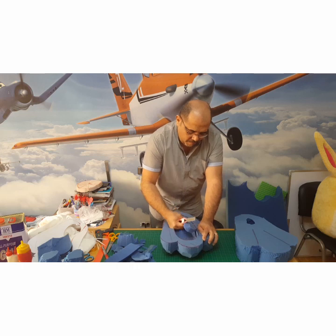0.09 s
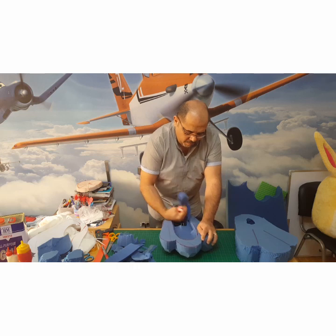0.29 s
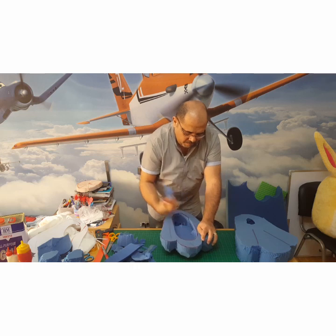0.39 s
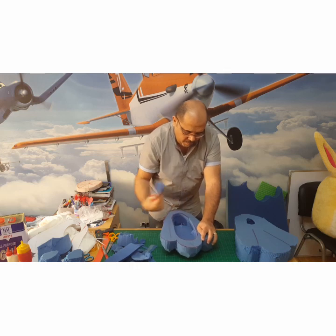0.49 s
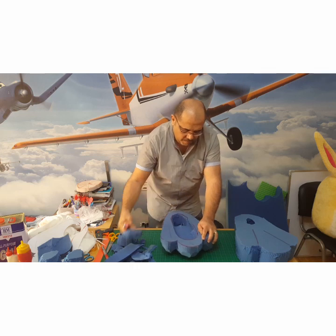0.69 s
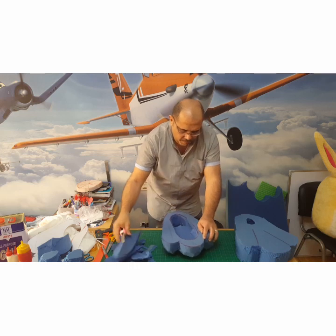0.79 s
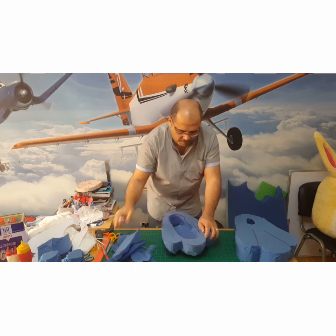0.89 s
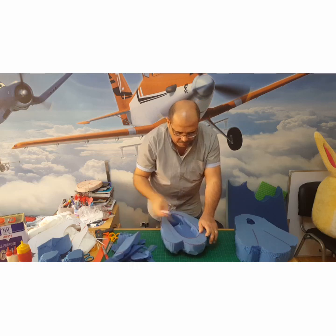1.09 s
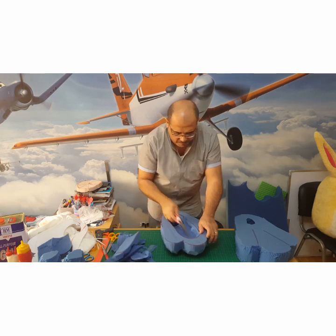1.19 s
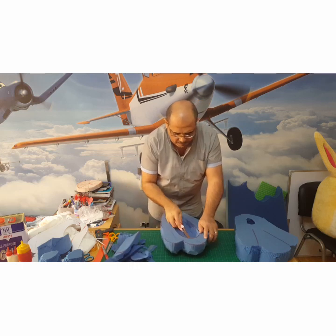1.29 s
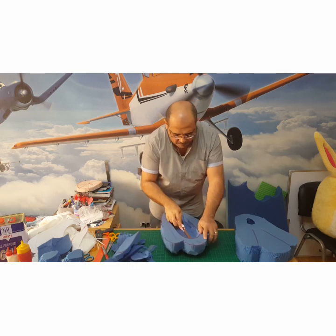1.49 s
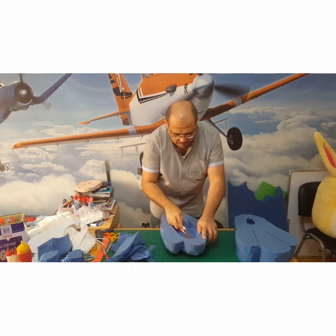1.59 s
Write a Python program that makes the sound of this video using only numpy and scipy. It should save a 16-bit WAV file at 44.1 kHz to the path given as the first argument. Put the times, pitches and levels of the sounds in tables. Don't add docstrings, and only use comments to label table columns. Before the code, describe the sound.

A scrap of foam rips free over a booming bench top, followed by small snaps and knife ticks

```python
import sys
import numpy as np
from scipy import signal
from scipy.fft import rfft, irfft
from scipy.io import wavfile
from scipy.ndimage import uniform_filter1d

SR = 44100
rng = np.random.default_rng(int(sys.argv[2]) if len(sys.argv) > 2 else 0)


def volts_from_db(level):
    exponent = np.asarray(level, float) / 20
    return 10 ** exponent


def file_out(sig):
    cols = np.atleast_2d(sig).T
    lim = np.clip(cols, -1, 1)
    pcm = np.round(lim * 32767).astype(np.int16)
    wavfile.write(sys.argv[1], SR, pcm)


N = 70560


def evened(x):
    return x / np.sqrt(np.mean(x ** 2) + 1e-20)


def read(points, hz):
    table_hz, value = np.transpose(points)
    return np.interp(np.log(hz + 1), np.log(table_hz + 1), value)


def add(mix, start_s, sound):
    part = mix[round(start_s * SR):][:len(sound)]
    part += sound[:len(part)]


def colour(x, points):
    gain = volts_from_db(read(points, np.fft.rfftfreq(len(x), 1 / SR)))
    return evened(irfft(rfft(x) * gain, len(x)))


def ring(modes, spot_hz, octaves, rise_s, turns):
    t = np.arange(SR // 2) / SR
    hz, db, t60 = np.transpose(modes)[:, :, None]
    near = np.exp(-.5 * (np.log2(hz / spot_hz) / max(octaves, .05)) ** 2)
    swing = np.sin(2 * np.pi * (hz * t + turns[:len(modes)]))
    fading = near * volts_from_db(db - 60 * t / t60)
    return np.minimum(t / rise_s, 1) * (fading * swing).sum(0)


def knocks(events, modes, grit_db):
    out = np.zeros(N)
    grit = rng.standard_normal((len(events), 4096))
    turns = rng.random((len(events), 16))
    t, hz = np.arange(4096) / SR, np.fft.rfftfreq(4096, 1 / SR) + 1
    for (start_s, db, spot_hz, octaves, length_s), noise, turn in zip(events, grit, turns):
        grit_octaves = 1.4 * octaves
        band = np.exp(-.5 * (np.log2(hz / spot_hz) / grit_octaves) ** 2)
        swell = np.e * t / length_s * np.exp(-t / length_s)
        add(out, start_s, volts_from_db(db + grit_db) * evened(irfft(rfft(noise) * band)) * swell)
        add(out, start_s, volts_from_db(db) * ring(modes, spot_hz, octaves, length_s, turn[:, None]))
    return out


# time_s, effort_db
EFFORT = [(0, -74.5), (.07, -73), (0.124, -62.5), (.175, -61.5), (0.21, -47.5), (.26, -56), (.33, -63),
          (.39, -71.5), (0.418, -58.5), (0.442, -52), (0.468, -71), (.6, -78.5), (.83, -80.5), (.89, -70),
          (1.07, -72), (1.11, -77.5), (1.2, -78), (1.6, -73.5)]
# pitch_hz, level_db (per Hz)
TEAR = [(250, -11.5), (480, -5.5), (1100, -9), (2200, -11.5), (3500, -16), (6000, -22.5), (11000, -25.5),
        (15500, -25.5)]
# pitch_hz, level_db (per Hz)
RUB = [(250, -7), (420, -8.5), (1100, -14.5), (2200, -15), (4500, -25.5), (8000, -36.5), (15500, -19)]


def foam():
    soft_db, hard_db, gain_db = -94, -56, 4
    cells_per_s, spread_db, puff_s = 5000, 5.5, 0.0021
    effort_db = np.interp(np.arange(N) / SR, *np.transpose(EFFORT))
    size = volts_from_db(spread_db * np.minimum(rng.exponential(1, N), 4))
    cells = size * (rng.random(N) < cells_per_s / SR)
    puff = np.exp(-np.arange(400) / SR / puff_s)
    power = abs(signal.oaconvolve(cells ** 2, puff ** 2)[:N])
    crackle = rng.standard_normal(N) * np.sqrt(power)
    hard = np.clip((effort_db - soft_db) / (hard_db - soft_db), 0, 1)
    mixed = hard * colour(crackle, TEAR) + (1 - hard) * colour(crackle, RUB)
    return volts_from_db(effort_db + gain_db) * mixed


# start_s, level_db, spot_hz, spread_octaves, length_s
SNAPS = [(.122, -63, 2500, 0.82, 0.0055), (.161, -61.5, 1100, 0.7, 0.0041), (.174, -64, 3000, 1.2, 0.0028),
         (.192, -52, 1200, 0.45, 0.0032), (.2095, -45.5, 1094, 0.71, 0.0018),
         (.211, -53, 9000, 0.62, 0.0047), (.226, -65, 7000, .9, 0.0038), (.244, -54.5, 2500, .9, 0.0023),
         (.264, -58.5, 2200, 0.88, 0.0043), (.28, -58, 2520, .9, 0.0052), (.24, -53, 1810, 0.47, 0.014),
         (.415, -61.5, 4400, 0.38, 0.0068), (.422, -62, 1760, 0.41, 0.0049), (.433, -55, 1257, 0.07, 0.005),
         (.435, -55, 1810, 0.058, 0.0036), (.436, -60.5, 2150, 0.072, 0.0059),
         (.438, -64, 8400, 0.63, 0.0043), (.855, -68, 570, 0.16, 0.004)]
# pitch_hz, level_db, t60_s (time to fade by 60 dB)
HOLLOW = [(570, -11, 0.03), (690, 12, 0.048), (858, 6, 0.042), (1111, 7, 0.027), (1195, 7, 0.042),
          (1253, 1, 0.037), (1474, 3.5, 0.038), (1777, 8, 0.037), (1930, 9, 0.028), (2076, -1, .04),
          (2154, -3.5, 0.032), (2240, -5, 0.035), (2820, 17, 0.0072), (8400, 13.5, 0.012)]


def foam_snaps():
    return knocks(SNAPS, HOLLOW, grit_db=-3)


# pitch_hz, level_db, t60_s
BENCH = [(58, -6.5, 0.17), (75, 0, 0.32), (116, -1.5, 0.34), (143.4, 4, 0.19), (177.87, 1, 0.19),
         (196.6, 2.5, 0.088), (233.7, 0, 0.16), (326.8, 4, 0.078), (399.5, 1, 0.18), (439, 2, 0.13),
         (483.6, -6, 0.28), (562, 5, 0.081)]
# start_s, level_db, spot_hz, spread_octaves
PUSHES = [(0.025, -57.5, 193, 0.6), (.044, -66, 90, 0.57), (0.127, -64.5, 145, 0.24),
          (.210, -28, 199.3, 0.075), (.212, -40.5, 125, 1.2), (0.228, -38.5, 330, 0.17),
          (.244, -35, 175, 0.06), (0.273, -46, 330, 0.12), (.288, -44, 190, 0.19), (.323, -45, 339, .08),
          (0.348, -59.5, 298, 0.27), (0.387, -50.5, 235, 0.1), (0.264, -39, 236, 0.1),
          (0.275, -44.5, 108, 0.43), (0.323, -39.5, 173.7, 0.064), (0.342, -46.5, 116, 0.12),
          (0.376, -50.5, 180, 0.096), (.402, -45.5, 195, .15), (0.432, -43, 116, 0.2),
          (0.447, -51, 234, .1), (0.443, -40, 328, 0.1), (0.482, -53, 116, 0.21), (0.511, -60, 393, 0.26),
          (.515, -55, 240, .08), (0.557, -57, 337, 0.12), (0.579, -54.5, 110.5, 0.15),
          (0.699, -67.5, 123, 0.3), (.857, -65, 537, 0.18), (0.872, -44.5, 199, 0.045),
          (0.877, -49, 236, 0.05), (0.887, -49.5, 74.6, 0.23), (0.894, -51.5, 176, 0.05),
          (0.901, -57.5, 323, 0.24), (0.929, -52.5, 70.6, 0.34), (0.927, -54.5, 159, 0.44),
          (.942, -56.5, 111, .12), (.955, -53, 178, 0.12), (.975, -56.5, 236, .07), (.99, -57.5, 142, 0.21),
          (1.015, -57.5, 168, 0.15), (0.939, -62, 244, 0.25), (1.121, -62.5, 141, 0.21),
          (1.171, -58.5, 59, 0.37), (1.208, -65.5, 160, 0.33), (1.235, -64, 62, 0.22),
          (1.39, -51.5, 173.5, 0.069), (1.39, -57.5, 119, 0.29), (1.445, -59, 170.8, 0.1)]
# start_s, change_db
MUTES = [
    (.226, -10),
    (.385, -1.5),
    (.468, -1.5),
    (.545, -8),
    (.65, 4.5),
    (.76, -14),
    (.91, -4),
    (.975, -6),
    (1.425, -5.5),
]


def bench():
    tear_free_s = .211
    wander_turns, wander_ms = .08, 50
    out, t = np.zeros(N), np.arange(N + SR) / SR
    steps = rng.standard_normal((len(BENCH), 3000))
    slow = evened(uniform_filter1d(uniform_filter1d(steps, wander_ms, 1), wander_ms, 1))
    wander = wander_turns * np.array([np.interp(t * 1000, np.arange(3000), row) for row in slow])
    wander -= wander[:, [round(tear_free_s * SR)]]
    mute_db = sum(db * np.clip((t - start_s) / 0.021, 0, 1) for start_s, db in MUTES)
    mode_hz = np.transpose(BENCH)[0][:, None]
    for start_s, db, spot_hz, octaves in PUSHES:
        first = round(start_s * SR)
        span = slice(first, first + SR // 2)
        turns = mode_hz * (t[first] - tear_free_s) + wander[:, span]
        boom = ring(BENCH, spot_hz, octaves, 0.0045, turns)
        add(out, start_s, volts_from_db(db + mute_db[span] - mute_db[first]) * boom)
    return out


# start_s, level_db, spot_hz, spread_octaves, length_s
TICKS = [(1.076, -60.5, 2770, 0.18, 0.0016), (1.076, -69, 4220, 0.13, 0.0015),
         (1.088, -72, 5500, 0.7, .003), (1.092, -70.5, 2520, .1, 0.0078), (1.1, -76, 3500, 0.44, 0.017),
         (1.29, -73.5, 2570, 0.25, .003), (1.386, -64.5, 3770, 0.12, 0.0017),
         (1.393, -66.5, 3840, 0.074, .002), (1.4, -77, 4040, .08, 0.0015), (1.388, -65, 1700, 0.58, 0.0024),
         (1.387, -67.5, 5500, 0.63, 0.0015), (1.392, -77, 3450, .8, 0.021), (1.447, -78, 6700, .1, .003),
         (1.453, -70, 2150, 0.24, 0.0027), (1.534, -64, 3920, 0.072, 0.0008),
         (1.54, -69.5, 3950, 0.073, .001), (1.536, -68, 6740, 0.94, 0.0064), (1.535, -72, 1600, 0.7, .001),
         (1.541, -66.5, 2000, 0.49, 0.0019), (1.548, -67.5, 2880, 0.071, 0.0048),
         (1.568, -75.5, 3020, .05, 0.0072), (1.583, -76, 2960, .05, .006)]
# pitch_hz, level_db, t60_s
KNIFE = [(940, -9.5, .03), (1327, -8, 0.027), (2004, 0, 0.062), (2150, -1, 0.033), (2520, -2, 0.057),
         (3020, -0.5, 0.035), (3620, 0.5, 0.022), (3980, -1.5, 0.051), (4110, -5, 0.05), (4370, -8, 0.017),
         (4910, -7, 0.032), (6800, -2, 0.023), (8200, -14, 0.021)]


def knife_ticks():
    return knocks(TICKS, KNIFE, grit_db=-1.5)


# pitch_hz, likeness (0 to 1, no unit)
SAME = [(60, 0.92), (250, 0.91), (600, 0.51), (2000, 0.045), (8000, 0.0068)]


def alike(pair):
    left, right = rfft(pair)
    same = np.clip(read(SAME, np.fft.rfftfreq(pair.shape[1], 1 / SR)), 0, 1)
    return irfft(np.array([left, same * left + np.sqrt(1 - same ** 2) * right]), pair.shape[1])


# pitch_hz, t60_s
ROOM = [(100, 0.82), (500, 0.42), (2000, 0.45), (8000, 0.39)]


def room(x):
    early_db, early_t60_s = 4, 0.051
    taps = np.zeros((2, SR))
    at = np.arange(40, SR - 20, 20) + rng.integers(0, 20, (2, (SR - 41) // 20))
    np.put_along_axis(taps, at, rng.choice([-1., 1.], at.shape), 1)
    hz, t, z = signal.stft(alike(taps), SR, nperseg=512)
    late = volts_from_db(-60 * t / read(ROOM, hz)[:, None])
    early = volts_from_db(early_db - 60 * t / early_t60_s)
    tail = signal.istft(z * (late + early), SR, nperseg=512)[1]
    spectrum = rfft(tail)
    broad = np.sqrt(uniform_filter1d(abs(spectrum) ** 2, size=120, axis=1))
    tail = irfft(spectrum / broad, tail.shape[1])
    tail = np.roll(tail, 256, axis=1) / np.linalg.norm(tail[0])
    return signal.fftconvolve(x[None], tail, axes=1)[:, 256:N + 256]


# pitch_hz, level_db
HUSH = [(58, -3), (200, -11.5), (330, -11), (420, -15), (1000, -18), (3000, -27.5), (7000, -35),
        (15500, -22.5)]


def hush():
    level_db, patch_db = -65, 1.36
    z = signal.stft(alike(rng.standard_normal((2, N + 2048))), nperseg=1024, noverlap=768)[2]
    drift = uniform_filter1d(rng.standard_normal(z.shape[1:]), 10, 0)
    patches = evened(uniform_filter1d(drift, 12, 1))
    air = signal.istft(z * volts_from_db(patch_db * patches), nperseg=1024, noverlap=768)[1][:, :N]
    return volts_from_db(level_db) * np.array([colour(side, HUSH) for side in air])


def scene():
    low, torn, snaps, knife = bench(), foam(), foam_snaps(), knife_ticks()
    wet = volts_from_db(-8.5) * low + volts_from_db(0.5) * (torn + snaps) + knife
    near = low + knife + snaps + volts_from_db(-6.5) * torn + room(wet)
    left_db = 1
    return near * volts_from_db(np.array([[left_db], [-left_db]])) + hush()


# pitch_hz, level_db
MIC = [(22, -25), (52, 3), (6000, 0), (8500, 0), (9300, -5.5), (10500, -8.5), (12000, -5.5), (14500, -8)]


def microphone(dry):
    heard = irfft(rfft(dry) * volts_from_db(read(MIC, np.fft.rfftfreq(N, 1 / SR))), N)
    whine_hz, whine_db, offset = 11200, -108.5, -0.00036
    whine = volts_from_db(whine_db) * np.sin(2 * np.pi * whine_hz * np.arange(N) / SR)
    return heard + whine + offset


def roll_off(x):
    return signal.sosfilt(signal.butter(12, 15890, fs=SR, output="sos"), x)


def record(dry):
    mix = microphone(dry)
    return roll_off(mix)


dry = scene()
out = record(dry)
file_out(out)
```